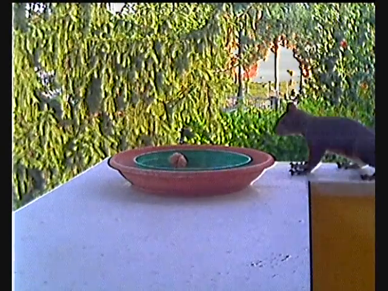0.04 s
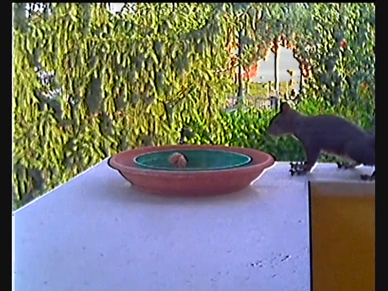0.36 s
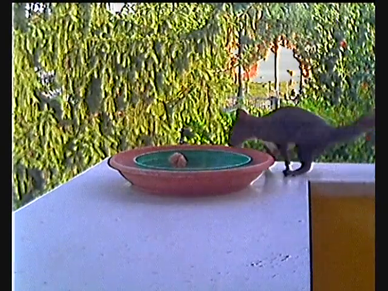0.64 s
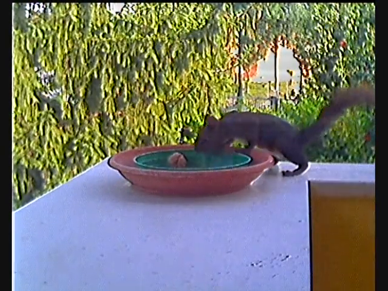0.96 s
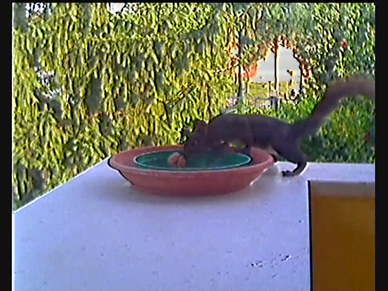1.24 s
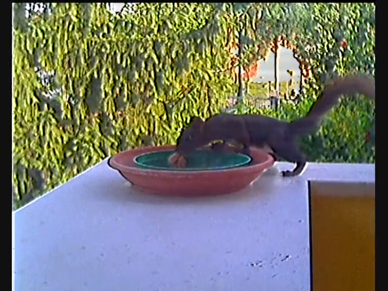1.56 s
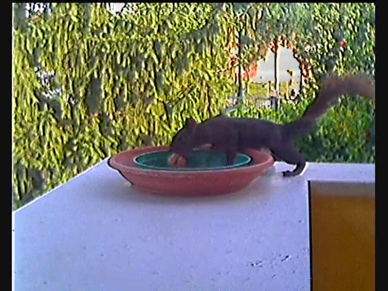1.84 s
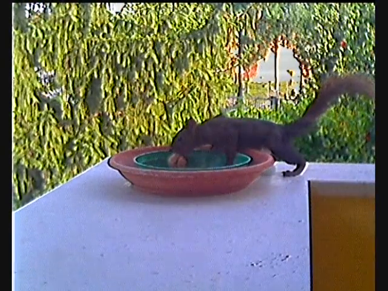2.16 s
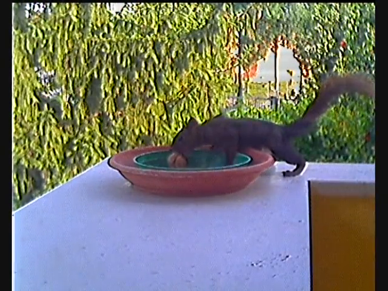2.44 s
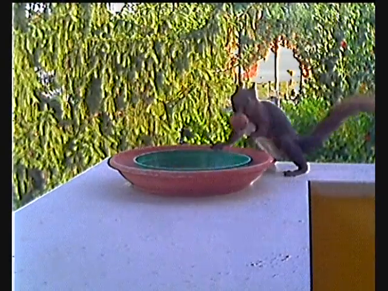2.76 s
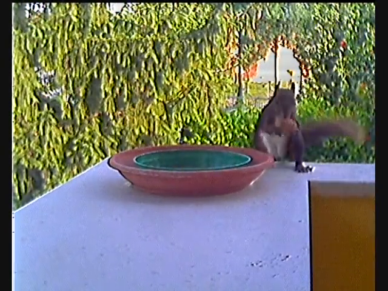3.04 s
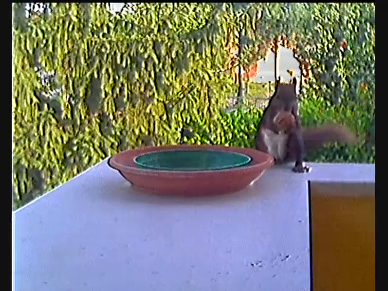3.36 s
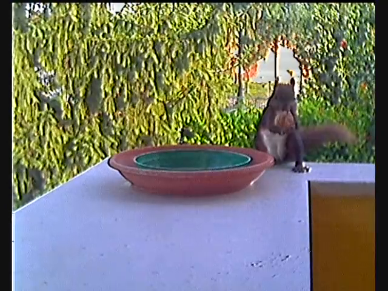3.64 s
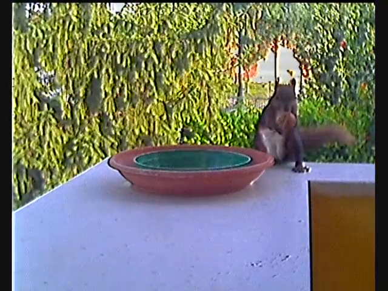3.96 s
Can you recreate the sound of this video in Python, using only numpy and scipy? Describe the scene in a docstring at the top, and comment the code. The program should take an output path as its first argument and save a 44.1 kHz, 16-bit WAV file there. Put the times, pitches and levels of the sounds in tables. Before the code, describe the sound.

A quiet, low electrical hum and a thin high whine from a camera's electronics continue unchanged throughout. Beneath them are slight hiss and a very deep, soft pulse several times a second. The microphone picks up nothing of the surroundings.

```python
"""A camera's own electronics hold its audio line at a large steady offset that dips a few times a second.
The offset, a resting level far from zero, is silent itself; its small, smooth dips make a very low pulse.
On it lie a faint low hum from pulses of interference, a thin whine of fixed high tones
and a trace of hiss from the circuits."""
import sys
import numpy as np
from scipy import signal
from scipy.fft import rfft, irfft
from scipy.io import wavfile

SR = 44100
rng = np.random.default_rng(int(sys.argv[2]) if len(sys.argv) > 2 else 0)


def store_wav(level_fs):
    """Save 16-bit WAV to argv[1]."""
    pcm = np.round(np.clip(np.atleast_2d(level_fs), -1, 1) * 32767)
    wavfile.write(sys.argv[1], SR, pcm.T.astype(np.int16))


N = 176400

DIP_HZ = 4.675   # dips of the offset per second


def offset():
    resting_level, dip_db = -.9672, -56   # both relative to full scale
    return resting_level - from_db(dip_db) * swells(first_s=.003, width_s=.017)


def hum():
    """Soft regular pulses of interference, strongest near 200 Hz, each with a short low ring."""
    # The tones that add up to the pulses: pitch_hz (before rounding), level_db
    hum_tones = [(129, -97), (172, -76.5), (215, -76.3), (258, -83), (301, -88), (345, -94), (388, -100.3),
                 (431, -108.7), (517, -112), (560, -108), (603, -110.5)]
    pulse_hz, first_pulse_s = 43.066, .0195
    ring_s, ring_hz = .0012, 172   # a tone at this pitch trails the pulse by this long
    t = seconds() - first_pulse_s
    pulses = np.zeros(N)
    for pitch_hz, level_db in hum_tones:
        delay_s = ring_s * (ring_hz / pitch_hz) ** 2   # lower tones trail further
        pulses -= harmonic(pitch_hz, level_db, pulse_hz, t - delay_s)
    return pulses


def whine():
    """Fixed high tones that flutter slightly, one throbbing at the rate of the dips, and one stray tone."""
    # The high tones of the electronics: pitch_hz (before rounding), level_db
    whine_tones = [(2756, -79.5), (5512, -73.5), (6891, -99), (8269, -91.5), (9647, -99.8), (11025, -83.5),
                   (13781, -103.6), (15159, -107)]
    base_hz = 1378.125
    flutter_depth, flutter_hz = .045, 55
    hz, t = np.fft.rfftfreq(N, 1 / SR), seconds()
    steady = sum(harmonic(pitch_hz, level_db, base_hz, t) for pitch_hz, level_db in whine_tones)
    # The strength wavers at random, mostly slower than flutter_hz.
    flutter = 1 + flutter_depth * shaped_noise(1 / np.sqrt(1 + (hz / flutter_hz) ** 4))
    # One of the tones swells once between dips.
    throb_tone = harmonic(pitch_hz=8269, level_db=-101.5, base_hz=base_hz, t=t)
    throb = swells(first_s=.081, width_s=.01) * throb_tone
    stray = tone(pitch_hz=3900, level_db=-113.6, t=t)
    return flutter * steady + throb + stray


def hiss():
    """Circuit noise: strongest in the bass, nearly flat in the treble but for a bump at 5-6 kHz."""
    # The strength of the noise from low to high: pitch_hz, level_db (per Hz)
    noise_curve = [(10, -103), (60, -106), (120, -112), (170, -123), (210, -143), (600, -144),
                   (900, -142.5), (5000, -145), (5300, -136), (6100, -136), (6400, -145), (16000, -145)]
    pitch_hz, level_db = np.transpose(noise_curve)
    hz = np.maximum(np.fft.rfftfreq(N, 1 / SR), 1)
    gains = from_db(np.interp(np.log(hz), np.log(pitch_hz), level_db))
    overall_level = np.sqrt(np.sum(gains ** 2) * SR / N)
    return overall_level * shaped_noise(gains)


def swells(first_s, width_s):
    """Smooth bumps of height 1, one per dip cycle."""
    cycles = (seconds() - first_s) * DIP_HZ
    from_top_s = ((cycles + .5) % 1 - .5) / DIP_HZ
    return np.exp(-.5 * (from_top_s / width_s) ** 2)


def harmonic(pitch_hz, level_db, base_hz, t):
    """A tone with its pitch rounded to the nearest whole multiple of base_hz."""
    return tone(np.round(pitch_hz / base_hz) * base_hz, level_db, t)


def tone(pitch_hz, level_db, t):
    """A pure tone with the given average (rms) level."""
    return np.sqrt(2) * from_db(level_db) * np.sin(2 * np.pi * pitch_hz * t)


def shaped_noise(gains):
    """Noise with each frequency weighted by its gain, scaled to an average (rms) level of 1."""
    noise = irfft(rfft(rng.standard_normal(N)) * gains, N)
    return noise / np.std(noise)


def from_db(db):
    """Turn decibels into a number to multiply by."""
    return 10 ** (np.asarray(db) / 20)


def seconds():
    """The time of every sample."""
    return np.arange(N) / SR


def scene():
    """Everything adds up on one audio line."""
    return (offset() + hum() + whine() + hiss())[None]


def record(dry):
    """Only the very highest treble is cut; the steady offset passes unchanged."""
    treble_cut = signal.cheby2(14, 60, 21000, fs=SR, output="sos")   # 60 dB down from 21000 Hz up
    start_level = dry[:, :1]
    return start_level + signal.sosfilt(treble_cut, dry - start_level)


dry = scene()
out = record(dry)
store_wav(out)
```